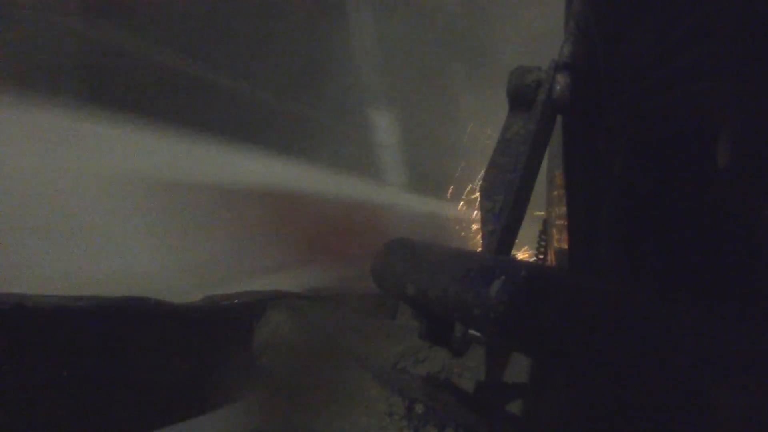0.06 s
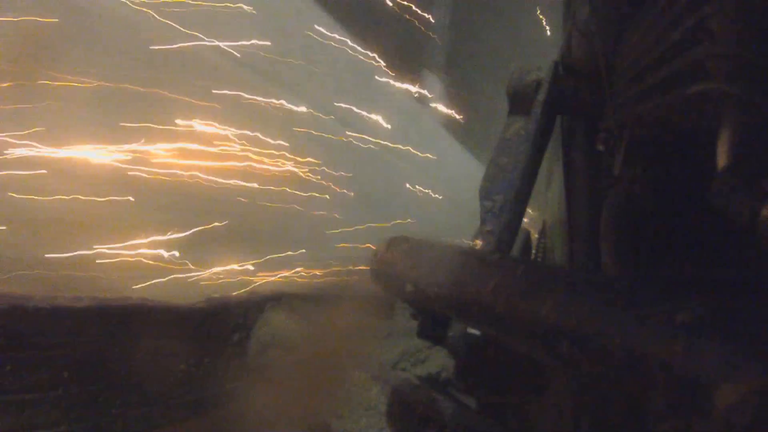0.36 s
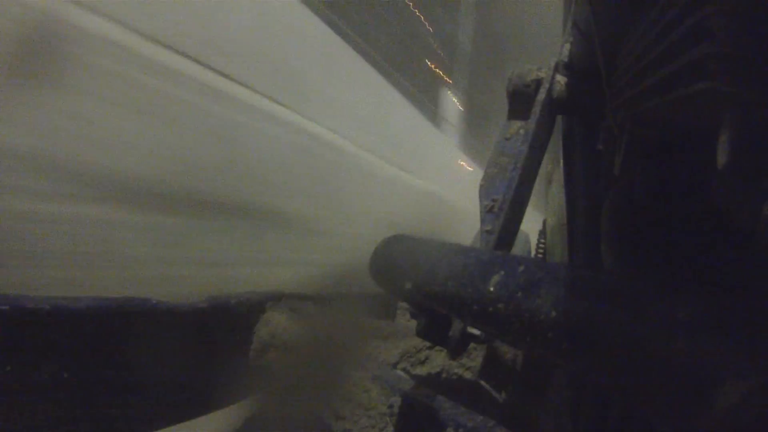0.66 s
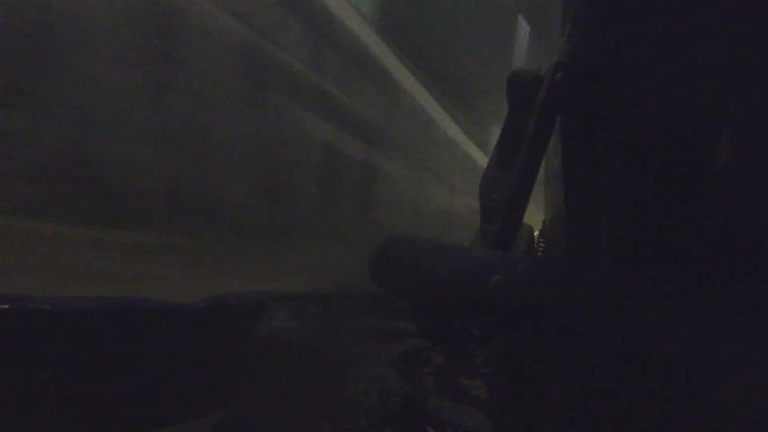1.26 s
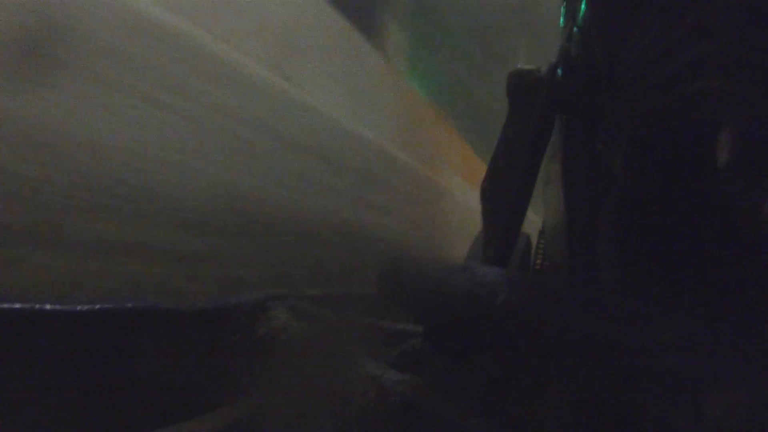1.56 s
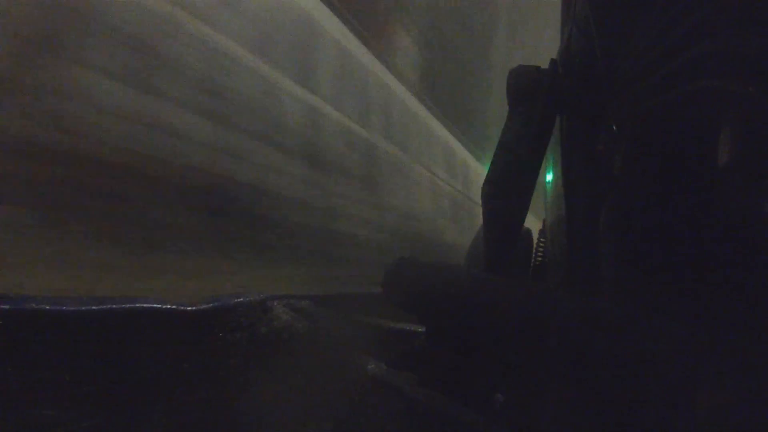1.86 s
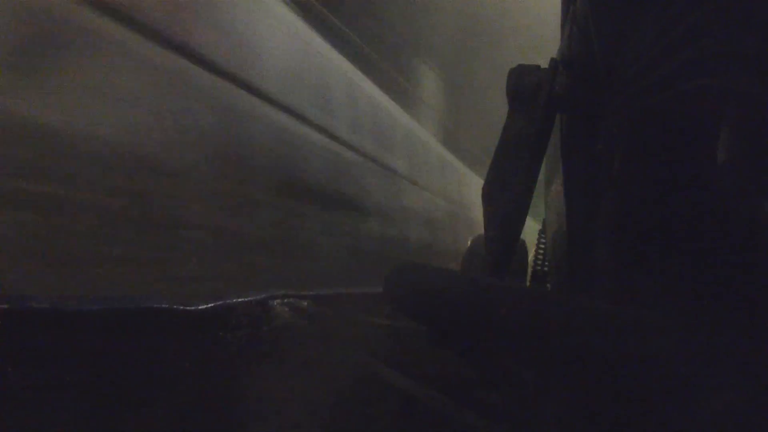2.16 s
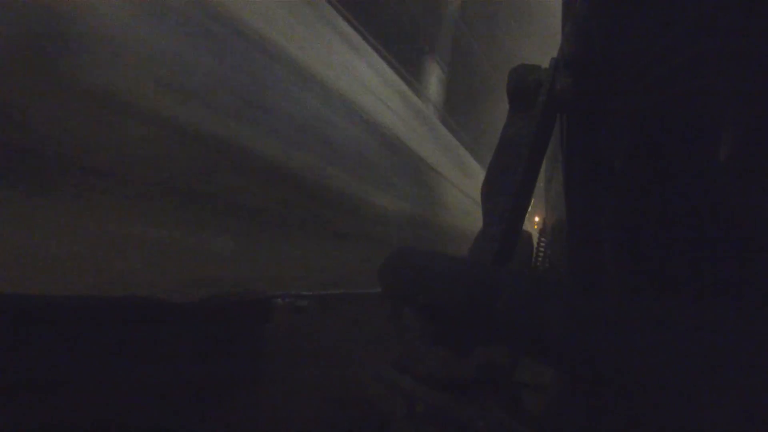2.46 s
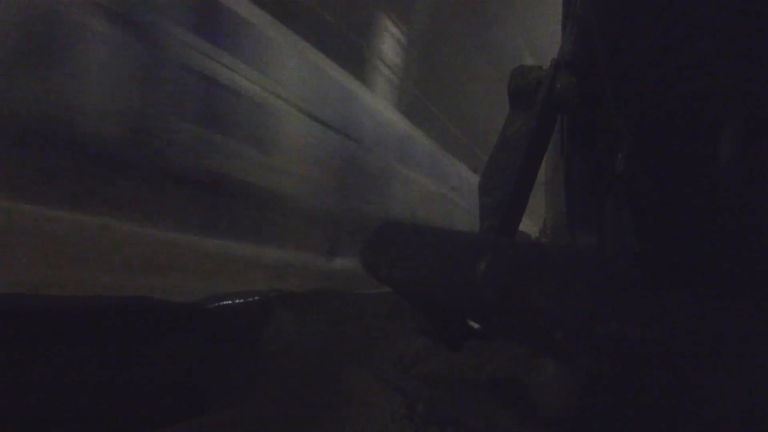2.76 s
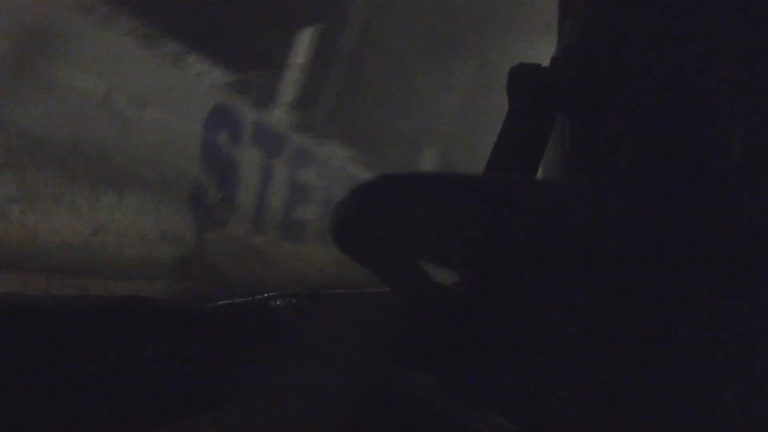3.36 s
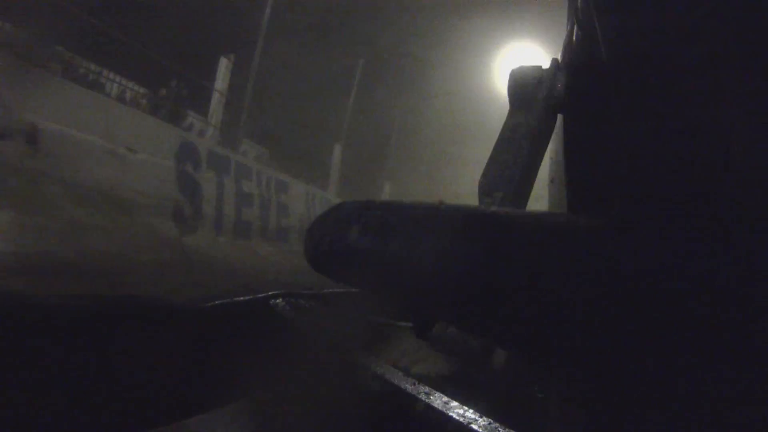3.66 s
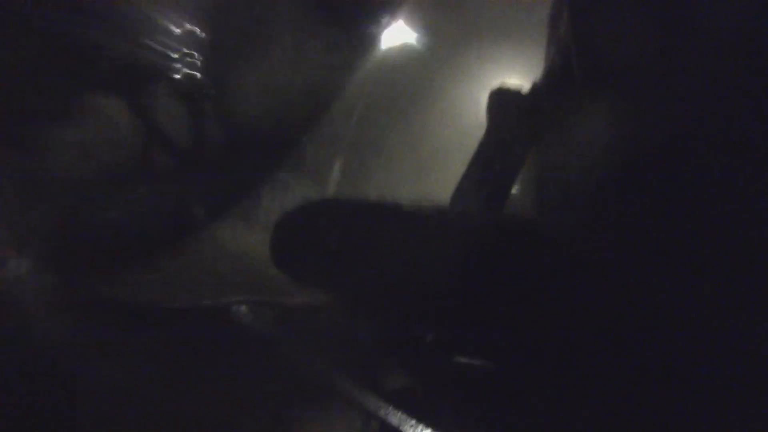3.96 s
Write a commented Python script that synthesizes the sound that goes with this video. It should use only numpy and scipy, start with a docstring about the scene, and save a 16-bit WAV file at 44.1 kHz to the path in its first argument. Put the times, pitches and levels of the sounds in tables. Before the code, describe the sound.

Racing car heard from on board, scraping a wall at full throttle, easing off, crashing twice.

```python
"""Stock car into the wall

On board, a V8 runs at full throttle while the car's side grinds and bangs on a concrete wall.
The driver lifts off and the car coasts, still rubbing, then crashes twice into the barrier as debris
ticks on the body. Rasp, rumble, grind and impacts ring in the sheet-metal shell, and the hardest blows
overload the microphone."""
import sys
import numpy as np
from scipy import signal
from scipy.fft import rfft, irfft
from scipy.io import wavfile

SR = 44100
rng = np.random.default_rng(int(sys.argv[2]) if len(sys.argv) > 2 else 0)


def inscribe(sig):
    """Save sig as 16-bit PCM at rate SR to the path in sys.argv[1].

    A 1-D sig is mono; a 2-D sig holds one channel per row.
    Samples are clipped to [-1, 1] before scaling.
    """
    pcm = np.round(np.clip(np.atleast_2d(sig).T, -1, 1) * 32767)
    wavfile.write(sys.argv[1], SR, pcm.astype(np.int16))


N = 176400
T = np.arange(N) / SR


def from_db(db):
    """Decibels to gain."""
    return 10 ** (np.asarray(db) / 20)


def rms_one(x):
    """Scale to rms 1."""
    return x / np.sqrt(np.mean(x ** 2) + 1e-20)


def automation(rows):
    """Straight ramps between (time, value) points."""
    return np.interp(T, *np.transpose(rows))


def drift(rate_hz):
    """A slow random wobble, rms about 1."""
    hop, settle = 40, 2000
    pole = np.exp(-2 * np.pi * rate_hz * hop / SR)
    noise = rng.standard_normal(N // hop + settle + 2)
    slow = signal.lfilter([1], [1, -2 * pole, pole ** 2], noise)[settle:]
    return np.interp(np.arange(N) / hop, np.arange(len(slow)), rms_one(slow))


def eq(x, curve):
    """Minimum-phase EQ through (frequency, gain) points; white noise keeps its power."""
    size = 4096
    hz, db = np.transpose(curve)
    bins_hz = np.fft.rfftfreq(size, 1 / SR)
    gain = from_db(np.interp(np.log(bins_hz + 1), np.log(hz), db))
    cepstrum = irfft(np.log(rms_one(gain)))
    cepstrum[1:size // 2] *= 2  # folded, so nothing rings ahead of a hit
    cepstrum[size // 2 + 1:] = 0
    return signal.fftconvolve(x, irfft(np.exp(rfft(cepstrum))))[:N]


def resonance(x, hz, width_hz):
    """Band-pass with gain 1 at its peak."""
    r = np.exp(-np.pi * width_hz / SR)
    feedback = [1, -2 * r * np.cos(2 * np.pi * hz / SR), r * r]
    return signal.lfilter(np.array([1, 0, -1]) * (1 - r * r) / 2, feedback, x + 1e-18)


def ring(start, hz, t60):
    """A struck mode: a dying sine."""
    age = np.maximum(T - start, 0)
    return np.sin(2 * np.pi * hz * age) * from_db(-60 * np.minimum(age / t60, 5))


def grains(per_s, spread_db):
    """Tiny random contacts of uneven size, rms 1."""
    sizes = from_db(spread_db * np.minimum(rng.exponential(1, N), 4))
    signs = rng.choice([-1, 1], N)
    return rms_one(sizes * signs * (rng.random(N) < per_s / SR))


def singing(peaks):
    """Noise narrowed to a few wavering pitches, rms 1."""
    tone = 0
    for hz, width, db in peaks:
        band = resonance(rng.standard_normal(N), hz, width)
        tone += from_db(db) * rms_one(resonance(band, hz, width))
    return rms_one(tone)


# Revs flat out, then coasting: (time [s], four-stroke cycle rate [Hz])
REVS_FLAT_OUT = [(0.0, 25.63), (0.164, 25.37), (0.324, 27.4), (0.458, 27.7), (0.542, 26.61), (0.572, 26.26),
                 (0.678, 26.73), (0.836, 27.55), (0.972, 28.9), (1.176, 28.06), (1.316, 28.8),
                 (1.444, 28.2), (1.474, 28.77), (1.574, 30.01), (1.594, 30.4), (1.79, 29.8)]
REVS_COASTING = [(1.85, 26.4), (1.95, 26.3), (2.05, 26.3), (2.4, 27.4), (2.9, 28.1), (3.2, 27.3), (4, 26.8)]
# Engine fader with the throttle shut: (time [s], level [dB])
COAST_FADER = [(1.8, -1), (2.03, -.5), (2.25, -4), (2.55, -4), (2.7, -11), (3, -8), (3.2, -12.5),
               (3.55, -8), (4, -13)]


def driver(lift_s=1.8, crossfade_s=0.066):
    """The driver lifts off: gives the cycle rate and the gains of the loaded and coasting engine."""
    cycle_hz = automation(list(REVS_FLAT_OUT) + list(REVS_COASTING))
    load = np.clip(.5 - (T - lift_s) / crossfade_s, 0, 1)
    coast = (1 - load) * from_db(automation(COAST_FADER))
    return cycle_hz, load, coast


# Exhaust partials before the boom: (multiple of cycle rate, loaded level [dB], coasting level [dB])
EXHAUST_PARTIALS = [(4, -45, -53), (5, -45, -54), (6, -32, -44), (7, -30, -54), (8, -45, -37.5),
                    (9, -29.5, -54), (10, -33, -46), (11, -35, -52), (12, -29, -53), (14, -31.5, -52),
                    (16, -37, -47), (18, -40, -46), (19, -41, -50), (21, -38, -56), (22, -36, -54),
                    (23, -35, -58), (24, -34.5, -35.5), (25, -44, -44), (33, -39, -52), (34, -37, -43),
                    (35, -38, -39)]


def exhaust(cycle_hz, cycles, load, coast, roughness=.12):
    """Uneven firing gives harmonics of the cycle rate; those near the cockpit's air resonance boom."""
    boom_hz, boom_octaves, boom_db = 229, .2, 11.5
    out = 0
    for k, load_db, coast_db in EXHAUST_PARTIALS:
        octaves_off = np.log2(k * cycle_hz / boom_hz)
        boom = from_db(boom_db * np.exp(-.5 * (octaves_off / boom_octaves) ** 2))
        phase = 2 * np.pi * (k * cycles + rng.random())
        partial = (1 + roughness * drift(15.6)) * np.sin(phase)
        partial += roughness * drift(10.3) * np.cos(phase)
        level = load * from_db(load_db) + coast * from_db(coast_db)
        out += np.sqrt(2) * boom * partial * level
    return out


# Accent of each cylinder, in firing order: (level [dB])
CYLINDER_ACCENTS = [2, -5, 0, -2, 3, -6, -1, -4]
# Midrange bark of the firings: (frequency [Hz], gain [dB])
RASP_EQ = [(150, -40), (320, -17), (450, 2.5), (700, 2), (1100, -4), (1600, -4), (2500, -20.5),
           (4000, -15.5), (8000, -35.5), (15000, -53)]


def rasp(cycles, load, coast, load_db=-32.5, coast_db=-41):
    """Each of the eight firings is a sharp pulse with a puff of noise."""
    firings = len(CYLINDER_ACCENTS) * cycles
    count = firings.astype(int)
    accent = from_db(CYLINDER_ACCENTS)[count % len(CYLINDER_ACCENTS)]
    pulses = rms_one(np.diff(count, prepend=0) * accent * (1 + 0.44 * rng.standard_normal(N)))
    puffs = rms_one(accent * np.exp(-(firings % 1) / 0.45) * rng.standard_normal(N))
    level = load * from_db(load_db) + coast * from_db(coast_db)
    return eq(pulses + 0.69 * puffs, RASP_EQ) * level


# Fader of the scrape along the wall: (time [s], level [dB])
GRIND_FADER = [(0, -18.5), (.1, -26), (.18, -23.5), (.25, -20.5), (.31, -22), (.47, -21), (.66, -25.5),
               (.84, -22.5), (.95, -21.5), (1.1, -22.5), (1.17, -18.5), (1.23, -23), (1.5, -21.5),
               (1.7, -19), (1.78, -22.5), (1.84, -28), (2.27, -27.5), (2.31, -25), (2.55, -28.5),
               (2.7, -32.5), (2.8, -32), (2.88, -28), (3.05, -29.5), (3.21, -36), (3.235, -33),
               (3.255, -22), (3.55, -34), (3.75, -30), (3.86, -33), (4, -35)]
# Its dark, gravelly tone: (frequency [Hz], gain [dB])
GRIND_EQ = [(30, -28.5), (65, -3.5), (110, -6), (180, -0.5), (300, -2), (520, -9.5), (1000, -4.5),
            (1800, -13), (3000, -21.5), (5000, -36), (8000, -45), (15000, -59)]


def wall_grind():
    """Concrete tears at the panels in dense, juddering grains."""
    tearing = grains(per_s=2500, spread_db=2.5) + 0.83 * rng.standard_normal(N)
    judder_db = 1.4 * drift(36)
    return eq(rms_one(tearing) * from_db(automation(GRIND_FADER) + judder_db), GRIND_EQ)


# Swells of the low bed: (time [s], level [dB])
RUMBLE_FADER = [(0, -29.5), (1.75, -40), (1.9, -49), (2.25, -33.5), (2.33, -23.5), (2.58, -24.5),
                (2.68, -39.5), (2.79, -36.5), (2.88, -25.5), (3.05, -26.5), (3.2, -48), (3.55, -30.5),
                (3.86, -35.5), (4, -43)]
# Its bass-heavy tone: (frequency [Hz], gain [dB])
RUMBLE_EQ = [(25, -31.5), (45, -19.5), (68, -5), (85, -17.5), (118, 3), (155, -7), (260, -1.5), (400, -8),
             (900, -14.5), (4000, -71.5)]


def rumble():
    """Tyres and chassis rumble under the car."""
    return eq(rng.standard_normal(N) * from_db(automation(RUMBLE_FADER)), RUMBLE_EQ)


# Pitches of the whine: (frequency [Hz], width [Hz], level [dB])
WHINE_BANDS = [(5510, 880, 7.5), (6010, 200, 0.5), (9300, 630, -20)]
# Its fader: (time [s], level [dB])
WHINE_FADER = [(0, -64), (1.1, -60), (1.7, -58), (2.06, -58), (2.1, -49), (2.15, -59), (2.5, -60),
               (2.95, -60), (3.2, -68), (4, -66)]


def whine():
    """Friction keeps high resonances sounding in the rubbing metal."""
    return singing(WHINE_BANDS) * from_db(automation(WHINE_FADER))


# Sheet-metal colour, peaks and two dips: (frequency [Hz], width [Hz], gain [dB])
PANEL_BANDS = [(211, 40, 8), (365, 38, -2.5), (435, 36, 2.5), (512, 24, 3.5), (658, 65, 4),
               (788.5, 50, 6.5), (915, 39, 4.5), (1107, 117, 5.5), (1450, 106, 5), (1786, 240, 1),
               (2510, 310, 5.5), (3700, 450, 2), (4300, 350, 4), (5960, 780, 2), (9050, 1400, -1.5)]


def shell(x):
    """The body panels stamp their resonances on whatever shakes them."""
    for hz, width, db in PANEL_BANDS:
        x = x + (from_db(db) - 1) * resonance(x, hz, width)
    return x * from_db(-3.5)


# Hits on the wall: (time [s], clang [dB], thump [dB], crack [dB], decay stretch [x])
WALL_HITS = [(.071, -15, -22, -38, 1.9), (.228, -22, -27, -42, 1), (.339, -5.5, -18, -29, 0.92),
             (0.351, -9, -12, -27.5, 1.3), (0.392, -2, -31, -22.5, 0.29), (0.44, -31, -15.5, -51, 1.7),
             (.809, -13, -15, -34, 1.01), (1.135, -24, -22, -51, 1.52), (1.164, -21, -17, -46, 1.17),
             (1.395, -10.5, -19, -35, 1.4), (1.426, -32, -18, -37, 1.01), (1.543, -10.5, -12, -43, 0.89),
             (1.555, -9.5, -29, -28.5, 1.4), (1.651, -12, -23, -34, 1.69), (2.069, -14.5, -20.5, -50, 1.46),
             (2.095, -20, -32, -50, 0.68), (2.135, -9.5, -11.5, -46, 0.98), (2.157, -11, -20, -34, 0.91),
             (2.302, -19.5, -27.5, -54, 1.4), (2.856, -27, -30, -59, 0.92), (3.254, -17, -28, -37, 0.98),
             (3.264, -7.5, -17.5, -26.5, 0.61), (3.289, -7.5, -23, -19, 0.88),
             (3.308, -9.5, -6.5, -13.5, 0.38), (3.347, -22, -15, -25, 1.17), (3.395, -21, -10, -40, 0.67),
             (3.889, -5, -11, -12.5, 0.86), (3.904, -6.5, -5, -9, 0.93), (3.919, -13.5, -11, -19, 2.1),
             (3.963, -9.5, -10, -13, 0.8)]
# Mid, low and high layers of a hit: (frequency [Hz], gain [dB])
CLANG_EQ = [(150, -44.5), (350, -1), (550, 2), (800, 2.5), (1300, -1), (2000, -10), (3000, -15.5),
            (5000, -29.5), (15000, -74.5)]
THUMP_EQ = [(25, -30), (60, -13), (120, 0), (200, 3), (330, 5.5), (500, -4.5), (1000, -14.5), (5000, -68)]
CRACK_EQ = [(800, -45), (2000, 9), (3500, 4), (6300, -2.5), (8500, -11), (12000, -15.5), (15000, -22)]


def blows(attack_s=0.001):
    """Each blow sets off a dying chatter of contacts: panel clang, frame thump and a short crack."""
    layers = [(CLANG_EQ, 0.14), (THUMP_EQ, 0.26), (CRACK_EQ, 0.11)]  # (EQ, unstretched t60 [s])
    out = 0
    for layer, (curve, t60) in enumerate(layers):
        power = np.zeros(N)
        for start, *levels_db, stretch in WALL_HITS:
            first = int(start * SR)
            age = T[:min(N - first, SR // 2)]
            attack = np.minimum(age / attack_s, 1)
            decay = from_db(levels_db[layer] - 60 * age / (t60 * stretch))
            power[first:first + len(age)] += (attack * decay) ** 2
        out += eq(np.sqrt(power) * grains(per_s=5000, spread_db=3.5), curve)
    return out


# Snap cues: (time [s], level [dB])
SNAP_CUES = [(2.382, -13), (2.392, -16), (3.308, -4), (3.458, 2)]
# Tone of the contact: (frequency [Hz], gain [dB])
SNAP_EQ = [(400, 18), (2500, 3), (6000, -6), (9000, -34), (15000, -11)]
# Steely ring after it: (frequency [Hz], width [Hz], relative level [dB])
SNAP_BANDS = [(1712, 200, -20), (2480, 200, 0), (3550, 450, -17), (4400, 550, -15), (6100, 700, -15)]


def snaps(t60=.014):
    """A loose steel part snaps against the frame and rings briefly."""
    envelope = sum(from_db(db - 60 * np.clip((T - start) / t60, 0, 5)) * (T > start)
                   for start, db in SNAP_CUES)
    contact = eq(envelope * rng.standard_normal(N), SNAP_EQ)
    out = 0
    for hz, width, db in SNAP_BANDS:
        makeup = np.sqrt(SR / np.pi / width)  # narrow bands pass less noise
        out += from_db(db) * makeup * resonance(contact, hz, width)
    return out / 2


# Close, bright ticks: (time [s], level [dB])
CHIP_CUES = [(3.134, -46), (3.7035, -14.5), (3.848, -29), (3.8691, -25)]


def chips():
    """Single chips of debris tick on the body."""
    return sum(from_db(db) * ring(start, hz=8150, t60=0.0011) for start, db in CHIP_CUES)


# Fader of the spray: (time [s], level [dB])
GRIT_FADER = [(3.24, -71), (3.3, -59), (3.34, -25), (3.39, -35.5), (3.46, -43), (3.56, -51.5), (3.68, -50),
              (3.86, -55.5), (4, -42)]
# Its sizzling top: (frequency [Hz], gain [dB])
GRIT_EQ = [(1500, -28), (3500, 0), (5000, 1), (7000, -2), (9500, -11), (12000, -9.5), (15000, -19)]


def grit():
    """Grit sprays off the barrier from the first crash on."""
    envelope = from_db(automation(GRIT_FADER)) * (T > GRIT_FADER[0][0])
    return eq(envelope * grains(per_s=8000, spread_db=4), GRIT_EQ)


# The two crunches: (time [s], hold [s], level [dB], release t60 [s])
CRUMPLE_CUES = [(3.262, 0.083, -13, 0.67), (3.889, 0.066, -13.5, 0.37)]
# Their low-mid weight: (frequency [Hz], gain [dB])
CRUMPLE_EQ = [(30, -6), (120, -1.5), (400, 6), (800, -2), (1500, -1.5), (3000, -15.5), (6000, -29),
              (9000, -37), (15000, -51)]


def crumpling():
    """Sheet metal buckles in a run of snaps through each crash."""
    force = sum(from_db(db - 60 * np.maximum(T - start - hold, 0) / t60) * (T > start)
                for start, hold, db, t60 in CRUMPLE_CUES)
    return eq(force * grains(per_s=2200, spread_db=4.5), CRUMPLE_EQ)


# Pitches of the squeal: (frequency [Hz], width [Hz], level [dB])
SQUEAL_BANDS = [(3650, 400, 3.5), (4090, 190, -1)]
# Its fader: (time [s], level [dB])
SQUEAL_FADER = [(3.4, -75), (3.52, -49), (3.62, -51), (3.671, -42), (3.729, -51), (3.82, -52), (3.9, -51)]


def squeal():
    """Bent metal rubs and squeals thinly, loudest between the crashes."""
    return singing(SQUEAL_BANDS) * from_db(automation(SQUEAL_FADER))


def crumbs(start_s=3.9):
    """Fine debris rains faintly on the body in the last crash."""
    falling = grains(per_s=87, spread_db=4) * (T > start_s)
    return from_db(-60) * resonance(falling, hz=10470, width_hz=6300)


# Low ring of the tube frame: (frequency [Hz], level [dB], t60 [s])
BOOM_MODES = [(204.3, -24, .6), (243.6, -15, 0.29), (333.6, -4, .2), (518, -4.5, 0.15)]


def frame_boom(struck_s=3.912):
    """The last crash sets the tube frame booming."""
    return sum(from_db(db) * ring(struck_s, hz, t60) for hz, db, t60 in BOOM_MODES)


def scene():
    """Rasp, rumble, wall grind, blows, crumpling and grit go through the shell; the rest comes direct."""
    cycle_hz, load, coast = driver()
    cycles = np.cumsum(cycle_hz) / SR
    engine = exhaust(cycle_hz, cycles, load, coast)
    body = shell(rasp(cycles, load, coast) + wall_grind() + rumble() + blows() + crumpling() + grit())
    friction = whine() + squeal()
    debris = snaps() + chips() + crumbs()
    return (engine + body + friction + debris + frame_boom())[None]


def record(dry):
    """The overloaded microphone soft-clips the peaks; the deepest bass and the top are cut."""
    ceiling, low_cut_hz, high_cut_hz = 0.76, 36, 15400
    squashed = dry / (1 + (dry / ceiling) ** 4) ** (1 / 4)
    low_cut = signal.butter(2, low_cut_hz, "high", fs=SR, output="sos")
    high_cut = signal.ellip(10, .1, 80, high_cut_hz, fs=SR, output="sos")
    return signal.sosfilt(high_cut, signal.sosfilt(low_cut, squashed))


dry = scene()
out = record(dry)
inscribe(out)
```